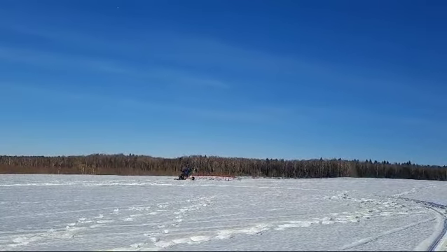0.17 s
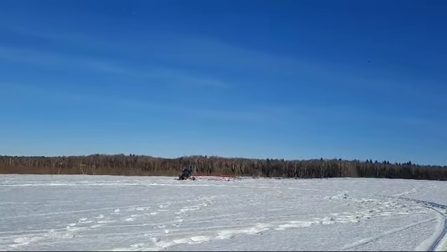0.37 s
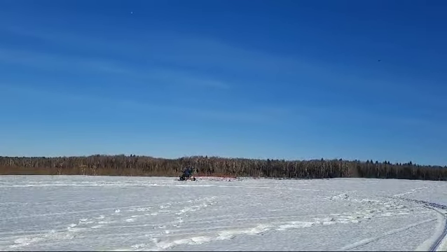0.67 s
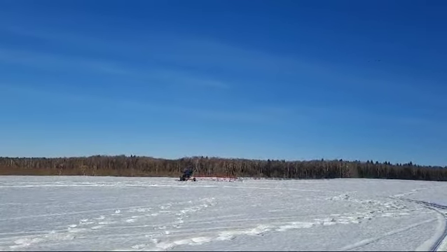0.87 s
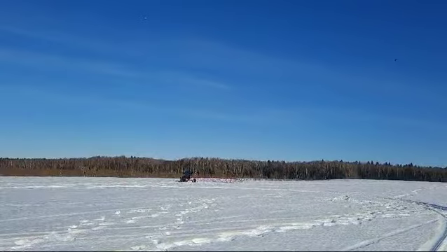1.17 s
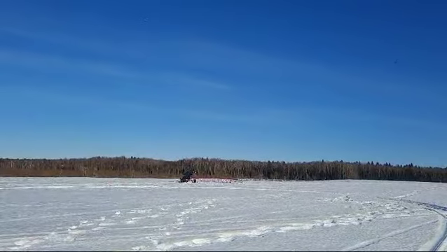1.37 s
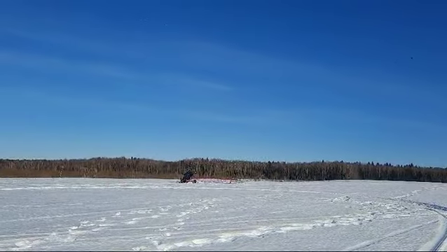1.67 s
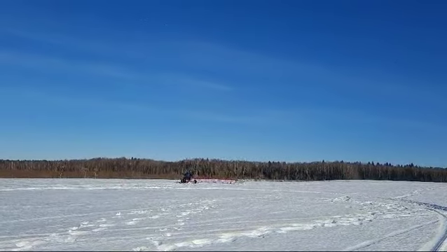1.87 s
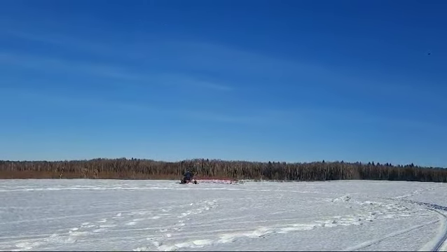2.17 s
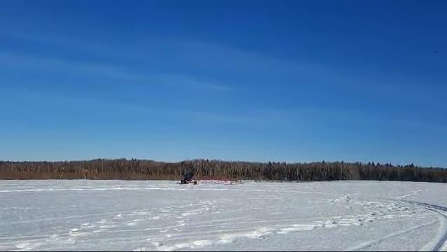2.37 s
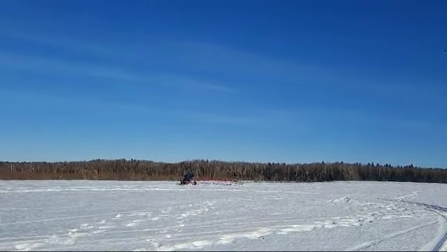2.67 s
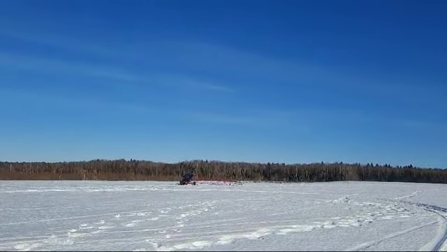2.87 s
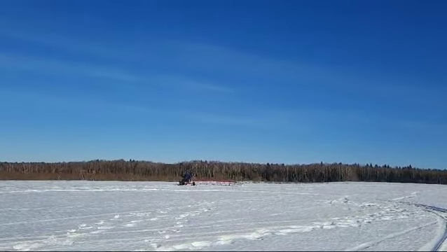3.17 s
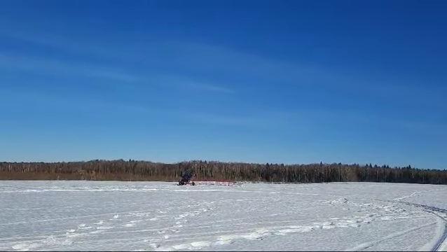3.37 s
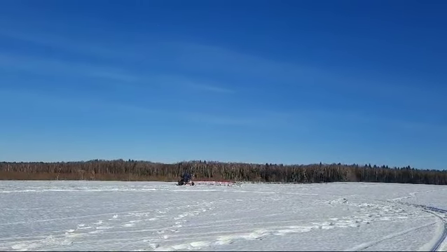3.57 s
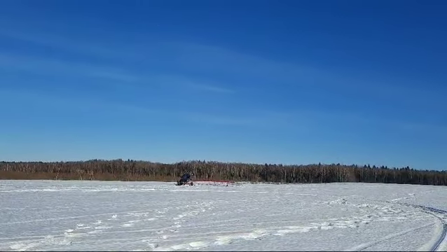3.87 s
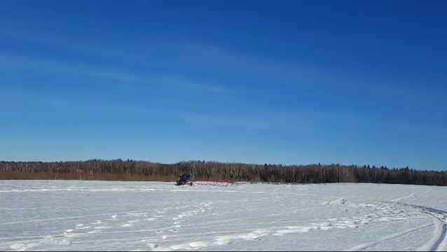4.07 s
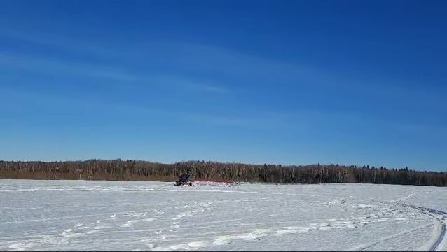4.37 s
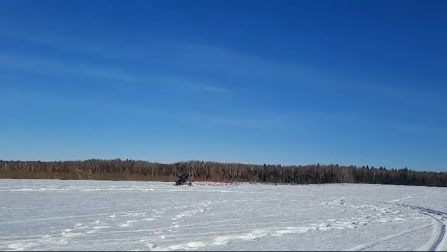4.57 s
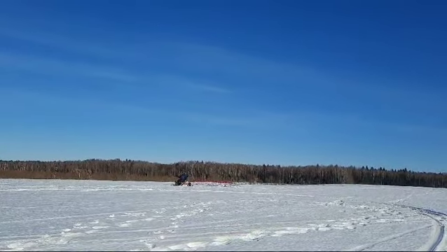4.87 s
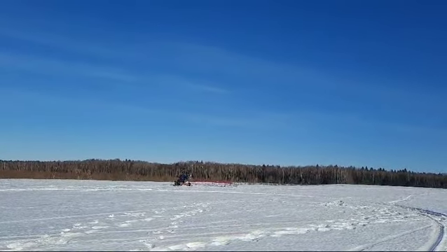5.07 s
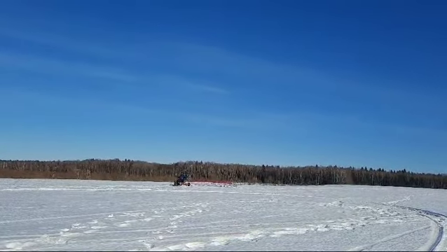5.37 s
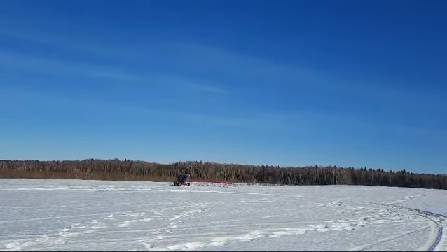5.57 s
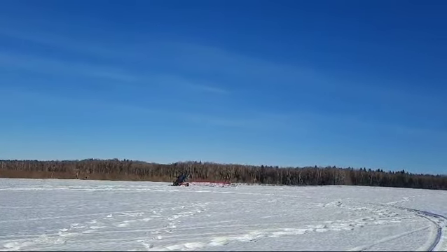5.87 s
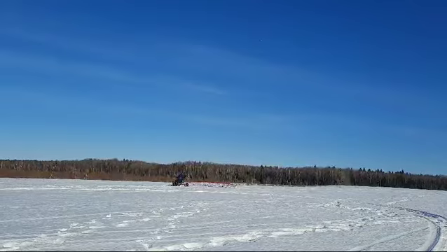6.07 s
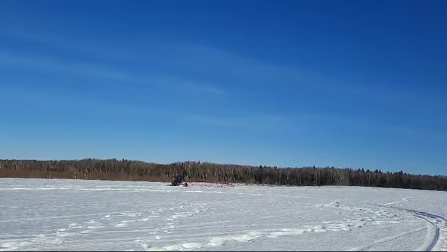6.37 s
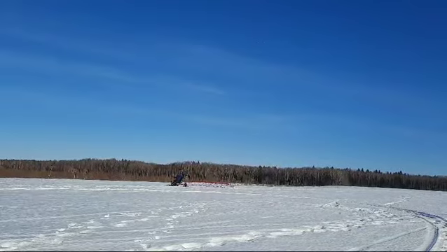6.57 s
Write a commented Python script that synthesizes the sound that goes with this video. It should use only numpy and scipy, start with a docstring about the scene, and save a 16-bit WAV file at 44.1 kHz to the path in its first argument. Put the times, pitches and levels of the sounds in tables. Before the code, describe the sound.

A low, muffled roar of moving air dominates, flickering in short gusts. Behind it, a distant little engine sputters continuously, each uneven firing a short crisp crack with a brief metallic ring, and a soft mechanical whirr between them rises very slightly. Two close microphone ports pick up open snowfield space, faint high hiss and occasional thin ticks. The engine never revs up or stops.

```python
"""A snowy field, with a small two-stroke engine idling far off: its crank turns, but only some turns fire.
Each firing is a dry crack of noise ringing the metal, over a steady whirr that puffs on every turn.
A broad low roar of shaped noise swells with the moving air and is notched by its bounce off the snow.
Two close microphone ports hear it all, with thin ticks near them and a faint noise hiss."""
import sys
import numpy as np
from scipy import signal
from scipy.fft import rfft, irfft, next_fast_len
from scipy.io import wavfile
from scipy.ndimage import uniform_filter1d, map_coordinates

SR = 44100
rng = np.random.default_rng(int(sys.argv[2]) if len(sys.argv) > 2 else 0)


def put_to_file(sound):
    """Save the sound as 16-bit audio at rate SR, in the file named by the first command-line argument."""
    columns = np.atleast_2d(sound).T  # one column per channel
    safe = np.clip(columns, -1, 1)
    whole_steps = np.round(safe * 32767)
    wavfile.write(sys.argv[1], SR, whole_steps.astype(np.int16))


def rack_gain(trim_db):
    """Turn a fader trim in dB into the linear factor to multiply a signal by."""
    fader = np.asarray(trim_db, float)
    return 10 ** (fader / 20)


N = 296352


def unit(x):
    """Scaled to rms 1."""
    return x / np.sqrt(np.mean(x ** 2) + 1e-20)


def along(points, hz):
    """(f/Hz, value) points read on a log frequency axis."""
    f, value = np.transpose(points)
    return np.interp(np.log(hz + 1), np.log(f + 1), value)


def curves(rows, t):
    """Each column after the time, read at times t."""
    s, *columns = np.transpose(rows)
    return [np.interp(t, s, column) for column in columns]


def wobble(rate, t):
    """A smooth random curve read at times t, rate knots a second."""
    return map_coordinates(rng.standard_normal(200), [t * rate])


def filtered(x, response):
    """x times a complex response of frequency."""
    size = next_fast_len(N + SR // 2)
    spectrum = rfft(x, size) * response(np.fft.rfftfreq(size, 1 / SR))
    return irfft(spectrum, size)[..., :N]


def resonance(f, centre_hz, width_hz):
    """A smooth peak of height 1; width_hz is from the centre to half height."""
    return 1 / (1 + ((f - centre_hz) / width_hz) ** 2)


# how alike the two microphone ports hear the field: (f/Hz, likeness 0-1)
PORT_LIKENESS = [(60, 1), (200, .995), (320, .985), (410, .92), (520, .96), (700, .945), (1350, .75),
                 (1650, .86), (3400, .83), (6000, .8), (8000, .62), (15000, .58)]


def ports(pair, likeness=PORT_LIKENESS):
    """Two unrelated signals mixed to the likeness that the ports have at each frequency."""
    def mid_side(hz):
        angle = np.arccos(np.clip(along(likeness, hz), 0, 1)) / 2
        return np.array([np.cos(angle), np.sin(angle)])

    mid, side = filtered(pair, mid_side)
    return np.array([mid + side, mid - side])


# swells of the faint hiss: (t/s, level of the low part/dB)
HISS_SWELLS = [(0, -79.5), (.5, -69.5), (.95, -69.5), (1.2, -91), (1.55, -71), (2.25, -78), (2.52, -68.5),
               (2.9, -72.5), (3.3, -77.5), (3.65, -78.5), (4.45, -82.5), (4.95, -69), (5.15, -81),
               (5.4, -69.5), (5.9, -73.5), (6.2, -74), (6.72, -68)]
# its two broad parts: (f/Hz, colour/dB per Hz)
HISS_LOW_COLOUR = [(2000, -18.5), (4500, -1), (6500, -8.5), (8000, -21), (9500, -20), (11000, -52.5)]
HISS_HIGH_COLOUR = [(6000, -34.5), (8000, -11), (9500, -17), (11000, -5), (15500, -11.5), (17000, -10.5)]
# high part: (mean level/dB, share of the low part's swing, own flicker/dB, flicker knots per s)
HISS_HIGH_MOTION = (-79, 0.16, 0.5, 4.5)
# thin flickering band in it: (t/s, level/dB)
HISS_BAND_LEVEL = [(0, -96), (.3, -82), (.8, -82), (1.1, -90), (1.6, -87), (2.1, -90), (2.5, -89),
                   (3, -86.5), (3.3, -83.5), (3.8, -88.5), (4.4, -85.5), (4.9, -86.5), (5.4, -91), (6, -92),
                   (6.72, -93)]
# short puffs in it: (t/s, half length/s, f/Hz, half width/Hz, level/dB)
HISS_PUFFS = [(0.517, 0.027, 6100, 447, -65), (0.55, 0.067, 6760, 1500, -75),
              (0.39, 0.079, 7070, 1700, -71.5), (0.401, 0.087, 13400, 2200, -73),
              (0.857, 0.042, 13200, 2000, -73.5), (2.461, 0.085, 6360, 1570, -69.5),
              (2.521, 0.05, 12600, 1900, -74.5), (3.02, 0.014, 6800, 300, -70.5)]
# how alike the ports hear the hiss: (f/Hz, likeness 0-1)
HISS_LIKENESS = [(4000, 0.55), (8000, .3), (15000, .1)]


def hiss():
    """Noise in two broad parts that swells now and then, with a flickering narrow band and short puffs."""
    t = np.arange(N) / SR
    low_db, = curves(HISS_SWELLS, t)
    mean_db, follows, flicker_db, flicker_per_s = HISS_HIGH_MOTION
    high_db = mean_db + follows * (low_db - low_db.mean()) + flicker_db * wobble(flicker_per_s, t)
    band_db = curves(HISS_BAND_LEVEL, t)[0] + 1.5 * wobble(25, t)

    def noise(response):
        return unit(filtered(rng.standard_normal((2, N)), response))

    air = rack_gain(low_db) * noise(lambda f: rack_gain(along(HISS_LOW_COLOUR, f)))
    air += rack_gain(band_db) * noise(lambda f: resonance(f, 8200, 160))
    air += rack_gain(high_db) * noise(lambda f: rack_gain(along(HISS_HIGH_COLOUR, f)))
    near = np.arange(-SR // 5, SR // 5)  # samples either side of a puff
    f = np.fft.rfftfreq(len(near), 1 / SR)
    for s, length, hz, width_hz, db in HISS_PUFFS:
        spectrum = rfft(rng.standard_normal((2, len(near)))) * resonance(f, hz, width_hz)
        swell = np.exp(-(near / SR / length) ** 2)
        air[:, round(s * SR) + near] += rack_gain(db) * swell * unit(irfft(spectrum))
    return ports(air, HISS_LIKENESS)


# steady bottom of the roar: (f/Hz, colour/dB per Hz)
DEEP_COLOUR = [(22, -31.5), (32, -18.5), (42, -15), (60, -6.5), (85, -9), (120, -6), (200, -38.5),
               (400, -88)]
# its level: (t/s, level/dB)
DEEP_LEVEL = [(0, -25), (.8, -38.5), (1.3, -35), (2.2, -34), (3.1, -34.5), (3.7, -33.5), (4.4, -37),
              (5.2, -34), (6, -35.5), (6.72, -34)]


def deep_roar():
    """The bottom of the far roar: noise of a fixed colour at a slowly moving level."""
    noise = unit(filtered(rng.standard_normal((2, N)), lambda f: rack_gain(along(DEEP_COLOUR, f))))
    level_db, = curves(DEEP_LEVEL, np.arange(N) / SR)
    return rack_gain(level_db) * ports(noise)


# far roar as the moving air carries it: (t/s, body level/dB, throat level/dB)
ROAR_LEVEL = [(0.04, -18.5, -35), (0.11, -27.5, -26.5), (0.15, -19, -31.5), (0.33, -26, -33),
              (0.43, -27, -28), (0.48, -24.5, -23.5), (0.58, -25, -31), (0.7, -38.5, -35),
              (0.78, -18.5, -26), (0.8, -18, -29), (0.95, -28.5, -27), (1.02, -13, -24.5),
              (1.06, -20.5, -27), (1.11, -13, -27), (1.24, -28, -28.5), (1.31, -19.5, -23),
              (1.39, -23, -30), (1.43, -17, -32), (1.5, -21.5, -30.5), (1.61, -17.5, -21),
              (1.68, -17, -35.5), (1.78, -29, -27.5), (1.96, -21, -34.5), (2.07, -29, -26.5),
              (2.11, -18.5, -32), (2.2, -28.5, -28.5), (2.39, -18.5, -33), (2.43, -24, -26),
              (2.48, -16.5, -28.5), (2.61, -29.5, -38), (2.68, -22, -25), (2.8, -22, -23.5),
              (2.88, -23.5, -27.5), (2.97, -23.5, -25), (3.05, -25, -25.5), (3.14, -25.5, -25),
              (3.16, -19, -26.5), (3.33, -17, -24), (3.42, -20.5, -19), (3.5, -16.5, -28),
              (3.55, -22, -25.5), (3.7, -24, -33.5), (3.74, -27.5, -35), (3.9, -18, -29.5),
              (3.96, -29.5, -31), (3.98, -23.5, -31.5), (4.12, -28.5, -34.5), (4.18, -24, -31.5),
              (4.42, -28, -38.5), (4.55, -29, -35), (4.7, -27.5, -34), (4.85, -29.5, -31.5),
              (4.94, -17.5, -27), (5.11, -28, -31.5), (5.33, -17.5, -22.5), (5.35, -19.5, -28.5),
              (5.46, -17.5, -26.5), (5.55, -27, -31), (5.63, -24, -27.5), (5.69, -23.5, -28),
              (5.75, -13.5, -26.5), (5.83, -26, -26), (5.9, -24, -25), (5.97, -23.5, -22.5),
              (6.03, -23.5, -24), (6.07, -21, -34.5), (6.16, -31.5, -29), (6.29, -21.5, -32),
              (6.33, -24.5, -18.5), (6.42, -24.5, -22.5), (6.5, -28, -27), (6.59, -30.5, -29.5),
              (6.68, -25, -30.5)]
# slow drift of its two resonances: (t/s, body f/Hz, throat f/Hz)
ROAR_RESONANCES = [(0, 263, 540), (1.2, 287.5, 547), (2.4, 298.5, 526), (2.9, 298, 532), (3.3, 311, 540),
                   (3.899, 310, 590), (4.4, 298, 595), (5.4, 322.6, 585), (6, 302, 616), (6.35, 302, 589),
                   (6.72, 307, 600)]
# its broad parts: (f/Hz, colour/dB per Hz)
RUMBLE_COLOUR = [(40, -48.5), (90, -14.5), (125, -2.5), (170, 4.5), (230, -5), (400, -10), (800, -30.5),
                 (1500, -92.5)]
EDGE_COLOUR = [(300, -50), (600, -5.5), (800, 0), (1000, -8), (1200, -18), (1500, -29), (2500, -76)]
# rumble within its band: (t/s, level/dB)
RUMBLE_SWELLS = [(0.0, -12.5), (0.05, -36), (0.07, -30), (0.22, -22.5), (0.26, -25.5), (0.3, -23.5),
                 (0.45, -25), (0.49, -27), (0.69, -20), (0.71, -25), (1.23, -22.5), (1.25, -28.5),
                 (1.48, -24), (1.5, -23.5), (1.81, -22), (1.85, -32.5), (1.91, -19), (1.98, -26.5),
                 (2.04, -25.5), (2.06, -31.5), (2.43, -26.5), (2.47, -17.5), (2.51, -26), (2.99, -26),
                 (3.09, -22.5), (3.27, -31), (3.29, -22.5), (3.59, -22), (3.63, -27), (4.59, -36),
                 (5.02, -28), (5.28, -27.5), (5.33, -24.5), (5.62, -31), (5.86, -25.5), (5.88, -27.5),
                 (6.08, -26.5), (6.12, -35), (6.32, -26), (6.72, -31.5)]
# bright edge within its band, flaring in the gusts: (t/s, level/dB)
EDGE_FLARES = [(0.0, -41), (0.03, -42.5), (0.24, -35), (0.37, -37.5), (0.43, -28), (0.49, -39), (0.8, -41),
               (0.88, -46.5), (0.99, -34.5), (1.01, -38), (1.16, -30.5), (1.38, -45), (1.42, -37.5),
               (1.48, -49), (1.5, -37.5), (2.3, -44), (2.43, -36), (2.45, -44), (2.73, -43), (2.81, -34.5),
               (2.86, -43), (2.98, -42), (3.01, -36.5), (3.05, -40), (3.24, -43.5), (3.41, -32.5),
               (3.44, -39), (3.65, -41.5), (4.08, -49), (4.34, -48.5), (4.38, -40.5), (4.44, -48.5),
               (5.45, -41), (5.48, -48), (5.67, -42), (5.73, -46.5), (5.74, -26), (5.76, -41), (5.91, -42),
               (6.01, -33), (6.06, -42), (6.21, -45.5), (6.32, -35.5), (6.51, -40.5), (6.55, -49),
               (6.59, -37), (6.64, -44.5), (6.72, -39)]
# bounce off the snow: (t/s, notch f/Hz, depth 0-1)
SNOW_BOUNCE = [(0, 374, 0.08), (1.5, 357, 0.55), (2.3, 385, 0.7), (3, 405, 0.73), (3.5, 417, 0.7),
               (3.8, 422, 0.8), (4.5, 424, 0.6), (5.1, 421, 0.8), (5.7, 426, 0.6), (6.15, 425, 0.7),
               (6.72, 421, 0.6)]
RUMBLE_BAND_HZ, EDGE_BAND_HZ = (100, 210), (800, 1300)
BODY_WANDER_HZ, THROAT_WANDER_HZ = 12, 23.7
# every part flutters on its own: depth in dB, knots per s
FLUTTER_DB, FLUTTER_PER_S = 1, 13


def roar(even=0.36, body_width_hz=72, throat_width_hz=150, notch_width_hz=38):
    """Noise in two broad slopes and two wandering resonances, notched by the bounce off the snow."""
    hz, t, z = signal.stft(rng.standard_normal((2, N)), SR, nperseg=2048, noverlap=1536)
    f = hz[:, None]

    def flutter(level_db):
        return rack_gain(2 * (level_db + FLUTTER_DB * wobble(FLUTTER_PER_S, t)))

    # each part carries its level, whatever its shape
    def hump(centre_hz, width_hz):
        power = resonance(f, centre_hz, width_hz) ** 3.0
        return power / power.mean(0)

    def slope(points, band):
        power = rack_gain(2 * along(points, f))
        return power / np.mean(power * (f > band[0]) * (f < band[1]))

    body_db, throat_db = curves(ROAR_LEVEL, t)
    body_hz, throat_hz = curves(ROAR_RESONANCES, t)
    body_hz = body_hz + BODY_WANDER_HZ * wobble(FLUTTER_PER_S, t)
    throat_hz = throat_hz + THROAT_WANDER_HZ * wobble(FLUTTER_PER_S, t)
    power = flutter(curves(RUMBLE_SWELLS, t)[0]) * slope(RUMBLE_COLOUR, RUMBLE_BAND_HZ)
    power = power + flutter(curves(EDGE_FLARES, t)[0]) * slope(EDGE_COLOUR, EDGE_BAND_HZ)
    power = power + flutter(body_db) * hump(body_hz, body_width_hz)
    power = power + flutter(throat_db) * hump(throat_hz, throat_width_hz)
    notch_hz, depth = curves(SNOW_BOUNCE, t)
    bounce = 1 - np.clip(depth, 0, 1) * resonance(f, notch_hz, notch_width_hz)
    # partly evens out the noise's own fluctuations, so that the level tables set the swells
    local = uniform_filter1d(uniform_filter1d(np.abs(z) ** 2, size=5, axis=1), size=7, axis=2)
    evening = (local / local.mean()) ** (-even / 2)
    shaped = z * np.sqrt(power) * bounce * evening
    return ports(signal.istft(shaped, SR, nperseg=2048, noverlap=1536)[1][:, :N])


# thin ticks close to the microphone: (t/s, onset level/dB, f/Hz)
NEAR_TICKS = [(0.447, -61, 12250), (0.53, -60.5, 11150), (2.9132, -59.5, 10520), (4.5001, -63.5, 12700),
              (4.5166, -67, 12400), (4.548, -61, 12750), (5.07, -60, 11960), (5.64, -62, 11300),
              (6.671, -66, 11050)]


def ticks(width_hz=1800):
    """Tiny decaying grains of band noise near the microphone, perhaps dry snow settling."""
    t, out = np.arange(400) / SR, np.zeros((2, N))
    f = np.fft.rfftfreq(len(t), 1 / SR)
    for s, db, hz in NEAR_TICKS:
        i = round(s * SR)
        grit = irfft(rfft(rng.standard_normal((2, len(t)))) / (1 + ((f - hz) / width_hz) ** 4))
        out[:, i:i + len(t)] += rack_gain(db - 60 * t / .008) * unit(grit)
    return ports(out)


# fins, muffler and cage ring with: (f/Hz, width/Hz, level/dB)
METAL_MODES = [(1600, 200, -2), (2280, 180, -2.5), (2770, 270, -5.5), (3390, 490, -7.5), (4080, 330, -1.5),
               (4740, 410, -2.5), (5480, 490, -3), (6570, 1100, -9.5), (8500, 500, -10),
               (10360, 610, -10.5), (11300, 420, -4), (13200, 1300, -14.5), (15100, 1000, -13.5)]


def metal(f, scatter_db=np.zeros(len(METAL_MODES))):
    """Causal sum of the engine's resonances, in alternating sign, each offset by its scatter_db."""
    total = 0
    for k, (centre_hz, width_hz, db) in enumerate(METAL_MODES):
        damping = 1j * f * width_hz
        mode = damping / (centre_hz * centre_hz - f * f + damping)
        total = total + (-1) ** k * rack_gain(db + scatter_db[k]) * mode
    return total


# steady whirr of belt and propeller through the same metal: (f/Hz, colour/dB)
WHIRR_COLOUR = [(1000, 0.5), (1600, 1.5), (3000, -1), (4500, -12.5), (6000, -20), (7500, -35.5),
                (10000, -48)]
# a firmer hum in it: (f/Hz, half width/Hz)
HUM_BAND = (2900, 280)
# level of the hum: (t/s, level/dB)
HUM_SWELLS = [(0, -65.5), (1.5, -72.5), (3, -71), (4.4, -73.5), (5.5, -64), (6.72, -72.5)]
# starting level in dB, slow rise in dB per s, random drift in dB
WHIRR_DB, WHIRR_DB_PER_S, WHIRR_DRIFT_DB = -60, 0.51, 1


def whirr(puff_db=4, scatter_db=3.0, puff_turns=1.0):
    """Steady mechanical noise, with a puff of uneven size as the port opens on every turn."""
    t, angle = np.arange(N) / SR, crank()
    turn = (np.floor(angle) - np.floor(angle[0])).astype(int)
    puff = rack_gain(puff_db + scatter_db * rng.standard_normal(N // 500)[turn])
    gate = 1 + puff * np.exp(-(angle % 1) / puff_turns)

    def gated(response):
        return unit(filtered(gate * rng.standard_normal((2, N)), response))

    noise_db = WHIRR_DB + WHIRR_DB_PER_S * t + WHIRR_DRIFT_DB * wobble(1.1, t)
    noise = rack_gain(noise_db) * gated(lambda f: metal(f) * rack_gain(along(WHIRR_COLOUR, f)))
    hum_db = curves(HUM_SWELLS, t)[0] + 4.4 * wobble(15, t)
    hum = rack_gain(hum_db) * gated(lambda f: resonance(f, *HUM_BAND))
    return ports(noise + hum)


TURNS_PER_S = 56.3  # nominal; the angle bends a little to meet each firing


def crank():
    """Crank angle in turns: every firing falls on a whole turn."""
    s = np.transpose(TURNS_THAT_FIRE)[0]
    steps = np.maximum(np.round(np.diff(s) * TURNS_PER_S), 1)
    turns = np.cumsum(np.r_[0, steps])
    t = np.arange(N) / SR
    outside = np.minimum(t - s[0], 0) + np.maximum(t - s[-1], 0)
    return np.interp(t, s, turns) + TURNS_PER_S * outside


# turns that fire, levels over the first 8 ms:
# (t/s, crack level/dB, ring level/dB, sizzle level/dB, bright spot of the crack f/Hz)
TURNS_THAT_FIRE = [(0.0689, -50, -56, -62, 4580), (0.1572, -59.5, -64, -66.5, 4080),
                   (0.2304, -68, -61, -73.5, 4580), (0.285, -70, -67, -80.5, 3200),
                   (0.32, -61, -70, -66, 3830), (0.407, -50.5, -56, -60, 5230),
                   (0.5669, -61, -61, -71.5, 3940), (0.7264, -61, -60, -62, 4630),
                   (0.7975, -59, -58, -58, 4400), (0.9021, -66, -60, -71.5, 4070),
                   (0.9746, -49.0, -53.5, -58.5, 4230), (1.118, -55, -61.5, -66.5, 4110),
                   (1.2276, -57, -54, -65.5, 5300), (1.3189, -66.5, -60, -82.5, 4050),
                   (1.3556, -59, -60.5, -70.0, 4120), (1.4277, -54.5, -60.5, -69.5, 4600),
                   (1.4982, -55.5, -59.5, -66, 4650), (1.5682, -59, -64, -69.5, 4720),
                   (1.6404, -53, -55, -64.5, 4050), (1.7473, -68, -68, -73, 3170),
                   (1.8022, -67, -63, -76.5, 4350), (1.837, -51, -54, -55.5, 4590),
                   (1.9607, -49, -54, -63, 4100), (2.0866, -55.5, -51.5, -60, 3330),
                   (2.2293, -52.5, -53.5, -63, 4650), (2.3331, -70, -66, -82, 4300),
                   (2.37, -54, -61, -64.5, 4070), (2.478, -61.5, -62.5, -80.5, 3300),
                   (2.5308, -63, -60, -69, 4620), (2.6014, -58.5, -62, -67.5, 4740),
                   (2.6696, -60.5, -58.5, -74, 4430), (2.8456, -55.0, -65, -72.5, 3860),
                   (2.9854, -49.5, -55, -60, 4190), (3.1083, -70, -61, -73.5, 5500),
                   (3.1818, -53.5, -59, -62.5, 4910), (3.272, -59, -59, -71, 4560),
                   (3.3638, -71, -66, -68, 5500), (3.4182, -52.5, -57, -62, 4660),
                   (3.5067, -54.5, -59, -57, 4100), (3.6471, -74, -77, -77, 4400),
                   (3.6837, -67, -68, -93, 4440), (3.7192, -62, -57.5, -70.5, 5800),
                   (3.7729, -69, -69, -94, 4730), (3.8432, -71, -66, -70.5, 4500),
                   (3.8608, -50.5, -55.5, -65.5, 4500), (3.9482, -58, -61, -75, 4680),
                   (4.0196, -61, -67, -75, 4070), (4.0907, -59, -63, -63.5, 4070),
                   (4.1611, -64, -60, -69.5, 4800), (4.2319, -58, -57, -61.5, 4890),
                   (4.3394, -62.5, -60, -74, 3200), (4.3908, -54.5, -61, -63, 4100),
                   (4.5917, -62, -64, -66.5, 4640), (4.6618, -53, -58.5, -61, 4080),
                   (4.8035, -54.5, -54, -59, 4440), (4.9273, -48, -52.5, -60, 3350),
                   (5.0307, -63, -73, -93, 3910), (5.1417, -58, -61, -63.5, 4590),
                   (5.2151, -58, -54, -65.5, 6000), (5.323, -61.5, -62, -72, 4500),
                   (5.3951, -62.5, -71, -68, 4700), (5.4465, -65, -65, -75.5, 4500),
                   (5.5174, -45.5, -53.5, -64.5, 5330), (5.6762, -52.5, -56, -59, 4030),
                   (5.7627, -52.0, -62, -63.5, 4830), (5.8698, -48, -54, -59, 4460),
                   (5.9935, -58, -62, -67.5, 4640), (6.0862, -52.5, -58, -57.5, 4100),
                   (6.195, -48.5, -54.5, -57.5, 4640), (6.3363, -59.5, -58, -68, 6240),
                   (6.3883, -64.5, -64, -80.5, 5470), (6.5134, -64, -65, -86, 6040),
                   (6.55, -65, -57, -75, 4500), (6.6013, -57, -58, -61, 4540),
                   (6.6867, -61, -68, -78.5, 3410)]
# lowest part of a firing over its ring, its scatter, scatter of a firing's side
THUD_DB, THUD_SCATTER_DB, PAN_SCATTER_DB = -0.5, 2, 1.5
# loose parts rattle on the two turns after: dB against the firing, loss in dB per turn, scatter in dB
RATTLE_DB, RATTLE_LOSS_DB, RATTLE_SCATTER_DB = -14, 2, 4


def firings(tail_db=-17, thud_t60=0.09, bang=11):
    """Each firing is a snap and a burst of gas into the metal; the lowest part builds slower and lingers."""
    size = 6750
    t, f = np.arange(size) / SR, np.fft.rfftfreq(size, 1 / SR)

    def fall(t60):
        return rack_gain(-60 * t / t60) * (1 - np.exp(-t / 0.0008)) * (t < .1)

    def above(hz):
        return 1 / (1 + (hz / (f + 1)) ** 8)

    def between(low_hz, high_hz):
        return above(low_hz) * (1 - above(high_hz))

    snap, tail = fall(.01), fall(.12)
    crack = rack_gain(10) * snap + fall(.036) + rack_gain(tail_db) * tail
    sizzle = rack_gain(9) * snap + fall(.024) + rack_gain(-18.5) * tail
    ring = fall(.04) + rack_gain(3) * snap
    thud = fall(thud_t60) * (1 - np.exp(-t / 0.0043))
    out, sides = np.zeros((2, N + size)), np.zeros(N)
    for s, crack_db, ring_db, sizzle_db, bright_hz in TURNS_THAT_FIRE:
        gas = rng.standard_normal((2, size))
        gas[0, 16] += bang  # the shock at the front of the gas
        thud_db = ring_db + THUD_DB + THUD_SCATTER_DB * rng.standard_normal()
        late_s = (np.arange(1, 3) + .15 * rng.standard_normal(2)) / TURNS_PER_S
        late_db = RATTLE_DB - RATTLE_LOSS_DB * np.arange(2) + RATTLE_SCATTER_DB * rng.standard_normal(2)
        rattle = sum(rack_gain(db) * np.roll(fall(.022), round(after * SR)) for after, db in zip(late_s, late_db))
        body = metal(f, 1.5 * rng.standard_normal(len(METAL_MODES)))  # modes struck harder or softer

        def part(db, shape, band):
            x = irfft(rfft(shape * gas) * band * body, size)
            front_rms = np.sqrt(np.mean(x[0, :SR // 125] ** 2))  # over the first 8 ms
            return rack_gain(db) * x / front_rms

        favoured = 1 + rack_gain(2) * resonance(f, bright_hz, 600)
        burst = part(crack_db, crack + rattle, favoured * between(2500, 8200))
        burst += part(sizzle_db, sizzle + .4 * rattle, above(6500))
        burst += part(ring_db, ring + rattle, between(1900, 3100))
        burst += part(thud_db, thud, between(1100, 2400))
        i = round(s * SR)
        out[:, i:i + size] += burst
        sides[i:] = PAN_SCATTER_DB * rng.standard_normal()  # holds until the next firing
    return ports(out[:, :N]) * rack_gain(np.array([sides, -sides]) / 2)


def scene():
    """The field at the two ports: hiss, deep roar, roar, ticks, then the engine's whirr and firings."""
    return hiss() + deep_roar() + roar() + ticks() + whirr() + firings()


def roll_off(x):
    """The treble ends steeply here."""
    return signal.sosfilt(signal.butter(12, 15820, fs=SR, output="sos"), x)


# phase by which the left port leads: (f/Hz, lead/rad)
PORT_LEAD = [(60, .18), (280, .19), (400, .5), (520, .14), (1100, .18), (1900, .1), (2800, -.3),
             (4000, -.2), (5700, -.9), (8000, -1.8), (10500, -.3), (15000, -1)]
# left port over right: (f/Hz, level/dB)
PORT_BALANCE = [(60, 1.3), (170, 1.9), (400, .5), (520, 4.5), (900, 2.2), (1100, 3.5), (1650, .8),
                (1950, 4.5), (2300, 2), (2800, 5.8), (4000, 4.3), (5700, -.7), (8000, -12), (11000, -4),
                (13000, -1), (15000, -2.5)]


def record(dry):
    """The microphone cuts the deep bass, and its two ports differ in colour and phase."""
    side = np.array([[.5], [-.5]])  # half of each difference to either port

    def microphone(f):
        bass_cut = (1j * f / (1j * f + 45)) ** 3  # three first-order cuts at 45 Hz
        return bass_cut * rack_gain(along(PORT_BALANCE, f) * side) * np.exp(1j * along(PORT_LEAD, f) * side)

    mix = filtered(dry, microphone)
    return roll_off(mix)


dry = scene()
out = record(dry)
put_to_file(out)
```